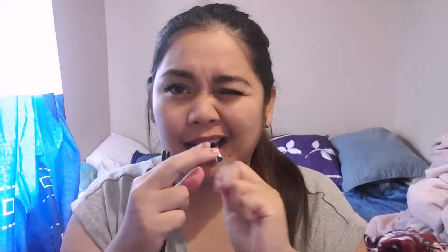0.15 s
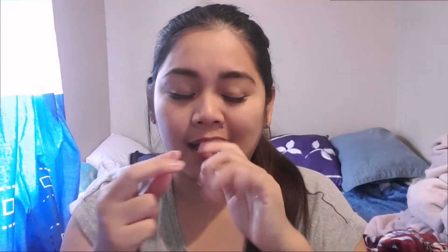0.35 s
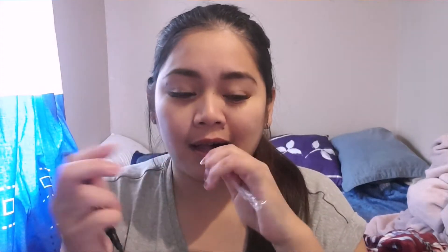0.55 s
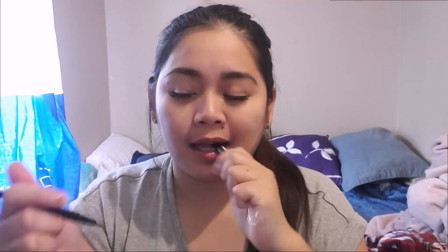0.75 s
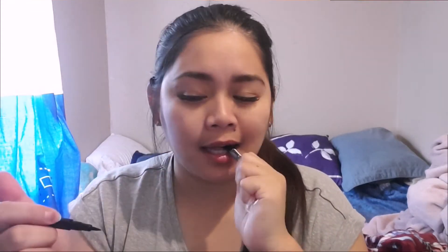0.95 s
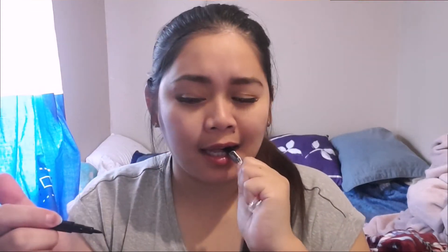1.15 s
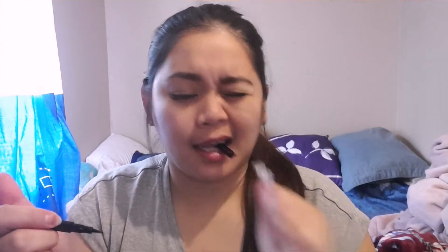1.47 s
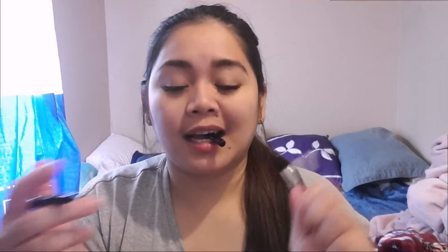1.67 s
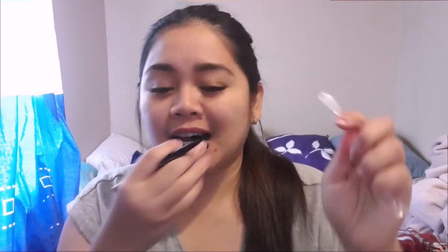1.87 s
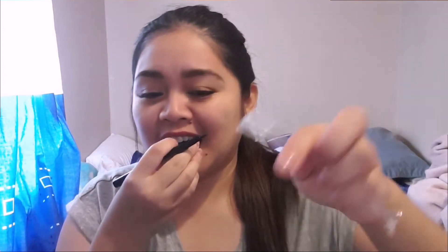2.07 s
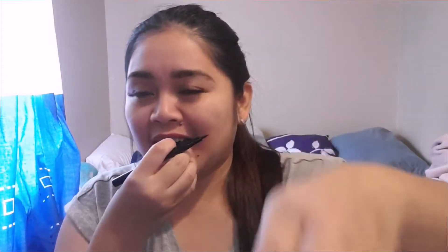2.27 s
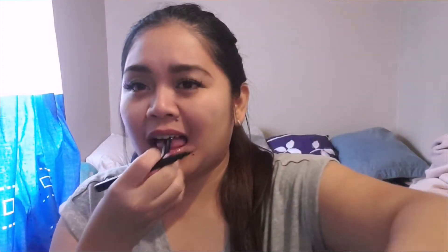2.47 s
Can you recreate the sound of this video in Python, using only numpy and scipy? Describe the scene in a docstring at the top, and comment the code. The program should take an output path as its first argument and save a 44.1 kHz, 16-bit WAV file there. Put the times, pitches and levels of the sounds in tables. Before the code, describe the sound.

Small plastic clicks and rustles, then a pen cap pops off, a fan humming behind.

```python
"""A plastic pen cap is worked loose between teeth and fingers in a small bedroom.
Tiny slips make the plastic tick and crinkle. The cap snaps over its catch, the barrel rings,
and the air in the cap gives a hollow pop; a few handling ticks follow.
A motor, probably a fan, hums and throbs throughout over faint room noise."""
import sys
import numpy as np
from scipy import signal
from scipy.fft import rfft, irfft
from scipy.io import wavfile
from scipy.ndimage import uniform_filter1d

SR = 44100
rng = np.random.default_rng(int(sys.argv[2]) if len(sys.argv) > 2 else 0)


def dump_mix(stems):
    """Bounce the given channels to the path in sys.argv[1] as a 16-bit WAV at rate SR."""
    frames = np.atleast_2d(stems).T  # one column per channel
    limited = np.clip(frames, -1, 1)  # hard clip at full scale
    pcm = np.round(limited * 32767).astype(np.int16)
    wavfile.write(sys.argv[1], SR, pcm)


N = 114660
T = np.arange(N) / SR
BURST_SIZE, BURST_RISE_S, LEFT_LAG_S = 2048, 0.0006, 0.00009


def from_db(db):
    """Decibels to gain."""
    return 10 ** (np.asarray(db) / 20)


def unit(x):
    """Unit energy per channel."""
    return x / np.sqrt(np.sum(x ** 2, axis=-1, keepdims=True) + 1e-20)


def at_hz(points, hz):
    """Interpolate on a log-frequency axis."""
    point_hz, value = np.transpose(points)
    return np.interp(np.log(hz + 1), np.log(point_hz), value)


def bins(size):
    """FFT bin frequencies in Hz."""
    return np.arange(size // 2 + 1) * SR / size


def coloured(x, db):
    """Minimum-phase filter, one gain per bin."""
    size = x.shape[-1]
    cepstrum = irfft(np.log(from_db(db)), size)
    cepstrum[1:size // 2] *= 2
    cepstrum[size // 2 + 1:] = 0
    return irfft(rfft(x) * np.exp(rfft(cepstrum)), size)


def add(out, time_s, x):
    """Mix x in at time_s."""
    i = int(time_s * SR)
    out[:, i:i + x.shape[1]] += x[:, :N - i]


def panned(x, pan_db):
    """Pan left (+) or right (-)."""
    return x * from_db([[pan_db / 2], [-pan_db / 2]])


def slip_burst(length_s=0.0041, crack_share=0.15, rattle_db=-10, rattle_s=0.0045, correlation=0.25):
    """Plastic slipping: a crack, tiny slips and a faint rattle, whitened; the right side leads."""
    t = np.arange(BURST_SIZE) / SR
    noise = rng.standard_normal((3, BURST_SIZE))
    stereo = np.sqrt(correlation) * noise[2] + np.sqrt(1 - correlation) * noise[:2]
    decay = np.exp(-(t / length_s) ** 2) + from_db(rattle_db) * np.exp(-t / rattle_s)
    slips = unit(stereo * decay * (1 - np.exp(-t / BURST_RISE_S)))
    crack = np.arange(BURST_SIZE) == int(BURST_RISE_S * SR)
    burst = np.sqrt(1 - crack_share) * slips + np.sqrt(crack_share) * crack
    burst[0] = np.interp(t - LEFT_LAG_S, t, burst[0], left=0)
    power = uniform_filter1d(np.mean(abs(rfft(burst)) ** 2, axis=0), size=40)
    return coloured(burst, -10 * np.log10(power + 1e-9))


# Snaps over the catch, then the barrel knocking against the cap's rim after the pop, and the single pop: (time
# [s], level [dB], length [s], crack energy share [0-1])
CONTACTS = [(1.4849, 10.6, 0.00096, 0.41), (1.486, 10.9, 0.0017, 0.12), (1.4884, 1.8, 0.0011, 0.35),
            (1.5024, 4.5, .003, 0.041), (1.5054, 3, 0.0042, .1)]
POP = (1.5016, 8.3, 0.0012, 0.15)
# Their spectra: (frequency [Hz], gain [dB])
SNAP_SPECTRUM = [(300, -23.5), (1000, -20), (2200, -23), (3200, -8), (3900, -15.5), (4800, 4), (6700, 0),
                 (8500, -9.5), (10000, -12.5), (12000, -6), (15000, -3), (16500, -14)]
POP_SPECTRUM = [(300, -30), (700, -27), (950, -10), (1200, 0), (1400, -6), (1680, 3), (2100, -0.5),
                (2600, -3.5), (4000, -8.5), (5400, -9), (6800, -1), (8700, -6.5), (11000, -2), (13500, 1.5),
                (16000, -30)]
# Cap air and barrel modes: (frequency [Hz], level [dB], T60 [s])
PEN_MODES = [(1730, -26, 0.015), (1996, -23, 0.014), (4888, -30, .11), (4950, -30, 0.089),
             (5800, -37, 0.09), (6050, -34, 0.075), (6840, -30, 0.081)]


def cap_release(slide_db=-13, slide_rise_s=0.001, air_modes_below_hz=3400):
    """The cap snaps over its catch, slides and pops off; the barrel and the air in the cap ring."""
    out, hz, t = np.zeros((2, N)), bins(BURST_SIZE), T[:SR // 4]
    snap_s, pop_s = CONTACTS[0][0], POP[0]
    for events, spectrum in [(CONTACTS, SNAP_SPECTRUM), ([POP], POP_SPECTRUM)]:
        for time_s, db, length_s, crack_share in events:
            burst = slip_burst(length_s, crack_share, rattle_db=-15.5)
            add(out, time_s, coloured(burst, db + at_hz(spectrum, hz)))
    stereo_t = t - np.array([[LEFT_LAG_S], [0]])
    for mode_hz, db, t60_s in PEN_MODES:
        struck_s = pop_s if mode_hz < air_modes_below_hz else snap_s
        ring = from_db(db - 60 * t / t60_s) * np.cos(2 * np.pi * mode_hz * stereo_t)
        add(out, struck_s + BURST_RISE_S, ring)
    slide = rng.standard_normal((2, N)) * np.exp(-abs(T - pop_s) / slide_rise_s) * (T < pop_s)
    out += coloured(slide, slide_db + at_hz(POP_SPECTRUM, bins(N)))
    return panned(out, pan_db=-1.5)


# Plastic ticks: (time [s], five relative band levels [dB], resonance [Hz], boost [dB], pan [dB])
TICKS = [(0.117, -45, -43.5, -45, -36, -41, 3750, 13, -3),
         (0.2074, -46, -38, -38, -34, -32, 4020, 6.6, -4.5),
         (0.2119, -41, -40, -36.5, -33, -35, 4000, 12, -3), (0.233, -56, -60, -53, -49, -35, 3850, 7.3, -5),
         (0.256, -46, -52, -41, -41, -43, 3900, 6.1, -8), (0.2676, -43, -50, -34, -48, -45, 1700, 6.7, 0),
         (0.2782, -53, -51, -41, -38, -35, 3900, 6, -6), (0.3017, -50, -37, -39, -43, -38, 4830, 7, -3.5),
         (0.3069, -43, -41.5, -34.5, -35.5, -27, 3830, 16, -3),
         (0.3081, -41.5, -41, -39.5, -45, -41, 4860, 11, -3), (0.36, -49, -55, -50, -40, -33, 4590, 2, -8),
         (0.387, -37, -40, -36, -36, -38, 3760, 3.4, 0.5), (0.399, -41, -38, -46, -51, -40, 3800, 6.6, 1),
         (0.4246, -55, -54, -42, -39, -34, 7740, 3, -11), (0.439, -49, -58, -48, -46, -34, 4620, 3, -4),
         (0.4472, -57, -52, -45, -40, -36, 2780, 20, -3.5), (0.464, -52, -42, -46, -38, -28, 5870, 2, -1),
         (0.5334, -46.5, -42.5, -40, -31.5, -25, 7100, 3, -3.5),
         (0.737, -53, -48.5, -40, -42.5, -39, 3000, 13, -2),
         (0.788, -36.5, -34.5, -32.5, -34, -27, 2985, 19.2, -3),
         (0.8, -36.5, -55, -48, -50, -32, 3420, 4, -2.5), (0.8288, -45, -50, -52, -45, -39, 3000, 3, -4),
         (0.84, -57, -38, -40, -39, -33, 2870, 10, -6), (0.843, -50, -34.5, -39, -35, -33, 3100, 15, -1.5),
         (0.8675, -66, -54, -45, -29.5, -38, 3380, 11, -6), (0.8793, -51, -45, -37, -41, -32, 6300, 4, -4),
         (0.9143, -54, -34, -35, -27, -28.5, 5550, 10.4, -4), (1.3425, -72, -72, -61, -51, -48, 4340, 2, 2),
         (1.3599, -60, -48, -40, -31.5, -17.5, 7100, 9.7, -3.5),
         (1.4041, -52, -52, -54, -35.5, -45, 7040, 2, -5),
         (1.7373, -49.5, -52, -44.5, -49, -34, 5930, 2, -5),
         (1.8037, -53, -44.5, -46.5, -26, -20.5, 4630, 2.2, -4.5),
         (1.8544, -62, -51, -48.5, -41, -34, 6480, 3, -5.5),
         (1.95, -63, -53, -52, -45.5, -45, 4380, 4, -4.5), (1.9879, -58, -49, -52, -46, -46, 7600, 3, -7),
         (2.008, -60, -51, -42, -42.5, -32, 5060, 4.1, -4.5)]
# The five bands: (frequency [Hz])
TICK_BANDS_HZ = [1500, 3400, 6000, 10000, 14000]
# Spectrum common to all ticks: (frequency [Hz], gain [dB])
TICK_SPECTRUM = [(200, -34), (650, -12), (1150, 1.5), (1420, -0.5), (1800, 7.5), (2450, 1), (3400, 3),
                 (6000, 5), (7700, 4.5), (9100, -2), (11000, 3), (14500, 1), (16000, -4)]


def ticks(gain_db=25, half_width_hz=360):
    """One slip burst per tick, with its own spectrum and one short resonance of the plastic."""
    out, hz = np.zeros((2, N)), bins(BURST_SIZE)
    for time_s, *bands_db, ring_hz, boost_db, pan_db in TICKS:
        shape_db = at_hz(list(zip(TICK_BANDS_HZ, bands_db)), hz) + at_hz(TICK_SPECTRUM, hz)
        ring_db = boost_db / (1 + ((hz - ring_hz) / half_width_hz) ** 2)
        tick = coloured(slip_burst(), gain_db + shape_db + ring_db)
        add(out, time_s, panned(tick, pan_db))
    return out


# Crinkling under the fingers: (start [s], end [s], level [dB])
CRINKLE_SPELLS = [(0.206, 0.344, -46), (0.36, 0.485, -48.5), (0.699, 0.737, -52), (0.785, 0.936, -48.5),
                  (0.958, 1.083, -54.5), (1.689, 1.785, -56.5), (1.838, 1.932, -57), (1.97, 2.11, -61.5),
                  (2.217, 2.278, -53.5)]
# Crinkle spectrum: (frequency [Hz], relative level [dB])
CRINKLE_SPECTRUM = [(300, -20), (1100, -2.5), (1900, -2.5), (2500, 2), (3400, 2.5), (3900, 6), (4300, 4),
                    (6500, 4.5), (8800, -1.5), (12000, 6.5), (14500, 1), (16000, -12)]


def crinkles(max_slips_per_s=1200, spread_db=3.5, fade_s=0.009, clump_s=0.006, clump_db=2.5, variants=6):
    """Tiny slips in uneven clumps: dense under firm fingers, sparser and fainter under a light touch."""
    effort = sum(from_db(db) * np.clip(np.minimum(T - start_s, end_s - T) / fade_s, 0, 1)
                 for start_s, end_s, db in CRINKLE_SPELLS)
    density = np.clip(effort / effort.max(), 0.5, 1) ** 2
    sizes = from_db(spread_db * np.minimum(rng.exponential(1, N), 4)) * rng.choice([-1, 1], N)
    knots_s = np.arange(0, T[-1] + clump_s, clump_s)
    clumps = from_db(clump_db * np.interp(T, knots_s, rng.standard_normal(len(knots_s))))
    onsets = rng.random(N) < max_slips_per_s * density / SR
    slips = sizes * clumps * onsets / np.sqrt(density)
    variant = rng.integers(0, variants, N)
    scrape = sum(signal.fftconvolve([slips * (variant == k)], slip_burst())[:, :N]
                 for k in range(variants))
    scrape = coloured(scrape, at_hz(CRINKLE_SPECTRUM, bins(N)))
    return panned(effort * np.sqrt(N) * unit(scrape), pan_db=-2.5)


# Room reflections: (frequency [Hz], gain [dB])
ROOM_SPECTRUM = [(300, 7.5), (1500, 0.5), (5000, 1.5), (9000, -0.5), (15000, -2)]


def bedroom(x, tail_db=-9, t60_s=0.21, build_s=0.0067, echo_db=-14.5, echo_s=0.0214, size=16384):
    """A short diffuse tail and one scattered wall echo."""
    t = np.arange(size) / SR
    build_up = 1 - np.exp(-(t / build_s) ** 2)
    tail = unit(rng.standard_normal((2, size)) * from_db(-60 * t / t60_s) * build_up)
    echo = unit(rng.standard_normal((2, size)) * np.exp(-abs(t - echo_s) / 0.00057))
    reflections = from_db(tail_db) * tail + from_db(echo_db) * echo
    response = coloured(reflections, at_hz(ROOM_SPECTRUM, bins(size)))
    return signal.fftconvolve(x, response, axes=1)[:, :N]


# Throbbing tones: (frequency [Hz], level [dB], lower sideband [dB], upper sideband [dB], crest [s])
THROB_TONES = [(148.3, -50, -18, -5, 0.067), (194.4, -46, -1.5, -14.5, 0.17),
               (248, -57.3, -7.5, -22, 0.187), (295.6, -67, -13, -12, 0.15), (314.6, -69, -4.5, -22, 0.15)]
# Steady tones: (frequency [Hz], level [dB])
STEADY_TONES = [(100.1, -62), (349, -72.5), (485, -75)]
# Drone swells: (start [s], end [s], level [dB])
DRONE_SWELLS = [(-.05, 0.156, -45), (.11, 0.33, -51.5), (0.37, 0.74, -42), (.68, .89, -49.5),
                (.92, 1.172, -43), (1.088, 1.4, -42.5), (1.38, 1.782, -42.5), (1.77, 2.042, -43.5),
                (2.023, 2.215, -46.5), (2.19, 2.57, -45)]


def motor(throb_hz=5.42, drone_hz=53.46, wander_hz=2.11):
    """Motor hum: tones throbbing at one rate, steady tones and a deep drone that swells and sinks."""
    hum = 0
    for hz, db, lower_db, upper_db, crest_s in THROB_TONES:
        turn = np.exp(2j * np.pi * throb_hz * (T - crest_s))
        carrier = np.exp(2j * np.pi * (hz * T + rng.random()))
        throb = 1 + from_db(lower_db) / turn + from_db(upper_db) * turn
        hum += from_db(db) * np.real(carrier * throb)
    for hz, db in STEADY_TONES:
        hum += from_db(db) * np.sin(2 * np.pi * (hz * T + rng.random()))
    wander = np.interp(T, np.linspace(0, T[-1], 14), rng.standard_normal(14))
    swells = sum(from_db(db) * np.sin(np.pi * np.clip((T - start_s) / (end_s - start_s), 0, 1))
                 for start_s, end_s, db in DRONE_SWELLS)
    drone = swells * np.sin(2 * np.pi * np.cumsum(drone_hz + wander_hz * wander) / SR)
    return np.sqrt(2) * (panned(hum, pan_db=-2.0) + drone)


# Room noise: (frequency [Hz], relative density [dB])
NOISE_SPECTRUM = [(20, -13), (36, -21), (48, -9.5), (66, -4.5), (86, -16), (106, -2), (135, -4),
                  (180, -4.5), (215, -12), (245, -13), (275, -20.5), (308, -10.5), (335, -19.5), (480, -22),
                  (600, -27.5), (900, -30), (1400, -35), (1900, -28), (2450, -36.5), (2900, -27.5),
                  (3400, -36), (4000, -29.5), (4500, -28), (5000, -34.5), (7600, -35.5), (9000, -44.5),
                  (16000, -37)]
# Its stereo image: (frequency [Hz], left-right correlation [0-1])
NOISE_CORRELATION = [(60, 0.85), (130, 0.99), (290, 0.66), (640, 0), (1400, 0), (15000, 0)]


def room_noise(rms_db=-46.5):
    """Low rush and faint hiss, correlated left to right only in the bass."""
    hz = bins(N)
    mid, side = rfft(rng.standard_normal((2, N)))
    correlation = at_hz(NOISE_CORRELATION, hz)
    stereo = np.sqrt(1 + correlation) * mid + np.sqrt(1 - correlation) * side * [[1], [-1]]
    noise = irfft(from_db(at_hz(NOISE_SPECTRUM, hz)) * stereo, N)
    return from_db(rms_db) * np.sqrt(N) * unit(noise)


def scene():
    """The pen close up, its reflections, the motor and room noise."""
    pen = ticks() + cap_release() + crinkles()
    return pen + bedroom(pen) + motor() + room_noise()


def record(dry):
    """Soft clipping, then a steep low-pass."""
    cutoff_hz = 15950
    lowpass = signal.ellip(12, 0.1, 90, cutoff_hz, fs=SR, output="sos")
    return signal.sosfilt(lowpass, np.tanh(dry))


dry = scene()
out = record(dry)
dump_mix(out)
```